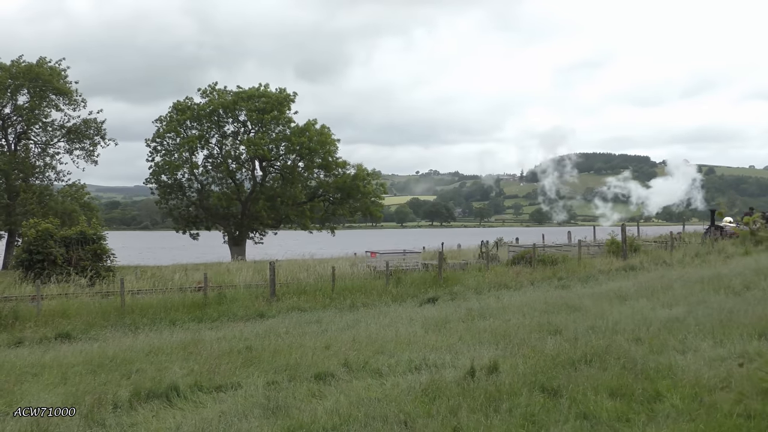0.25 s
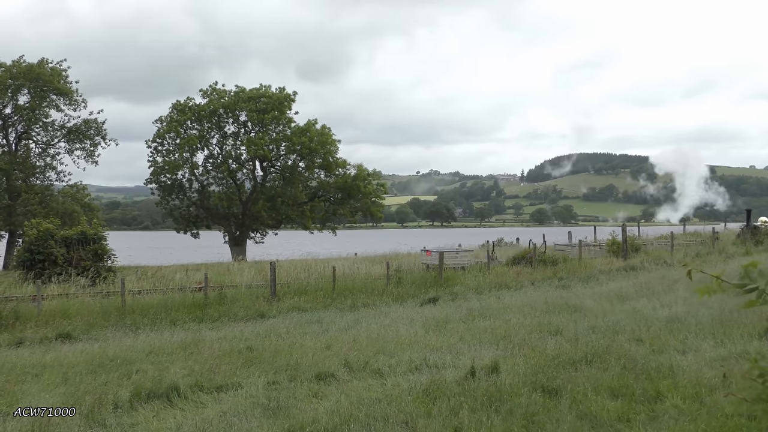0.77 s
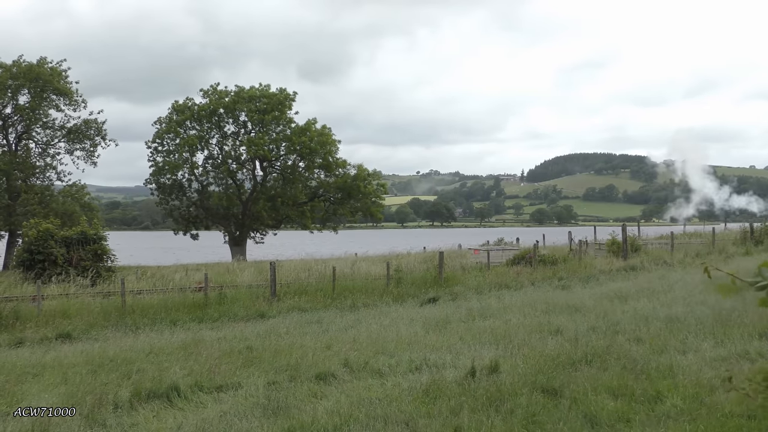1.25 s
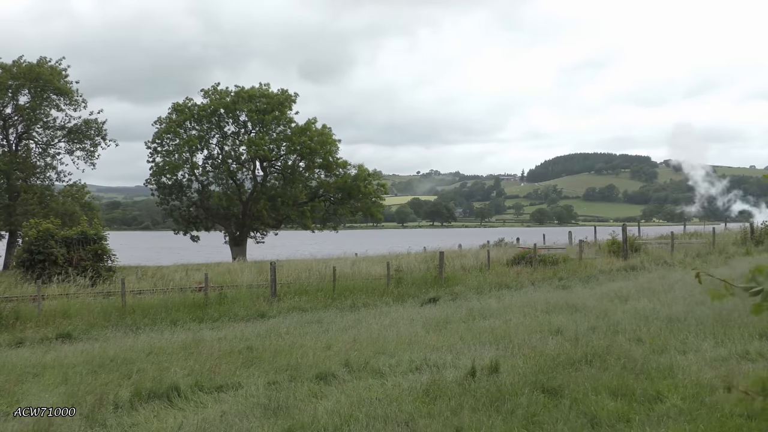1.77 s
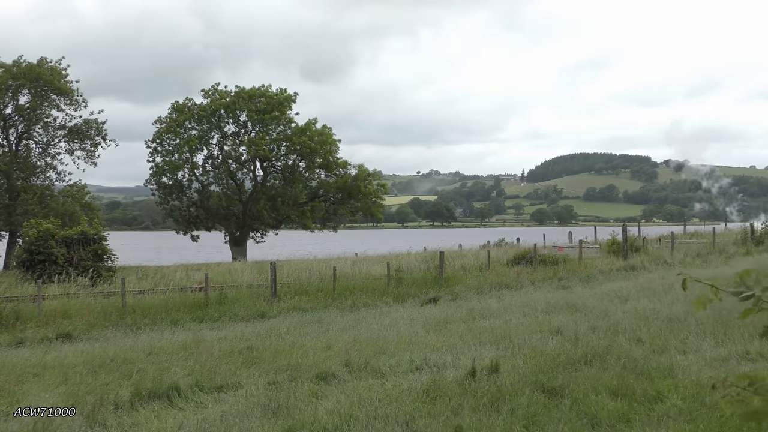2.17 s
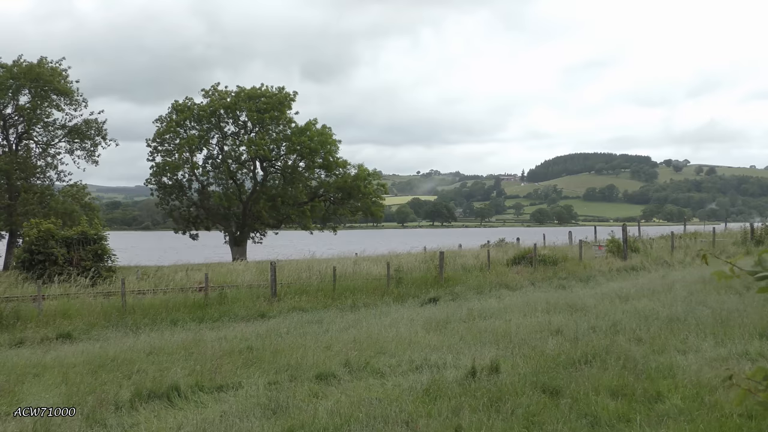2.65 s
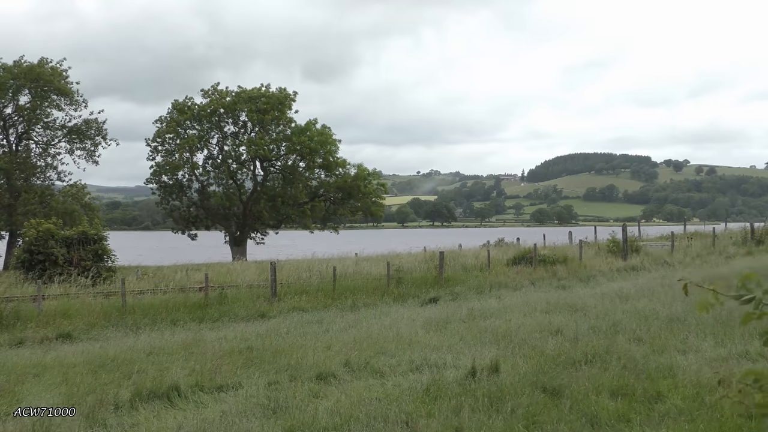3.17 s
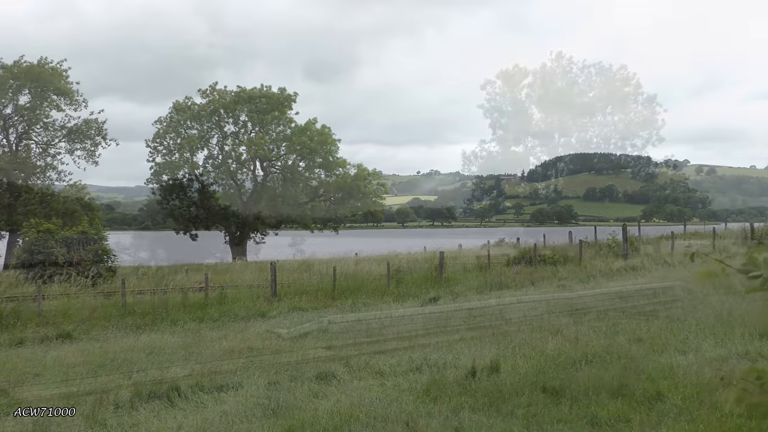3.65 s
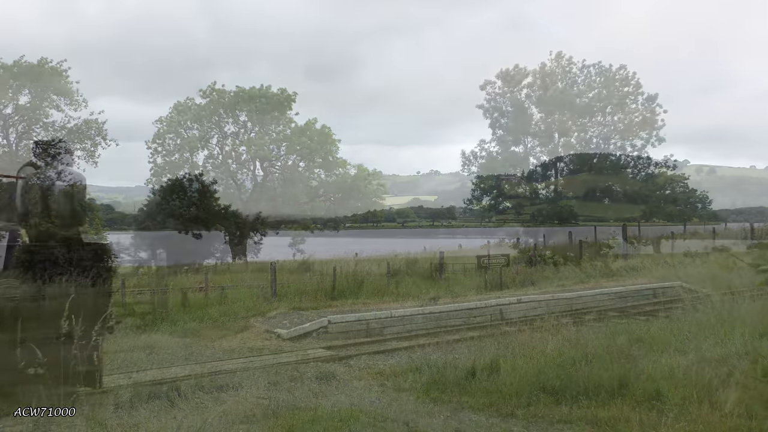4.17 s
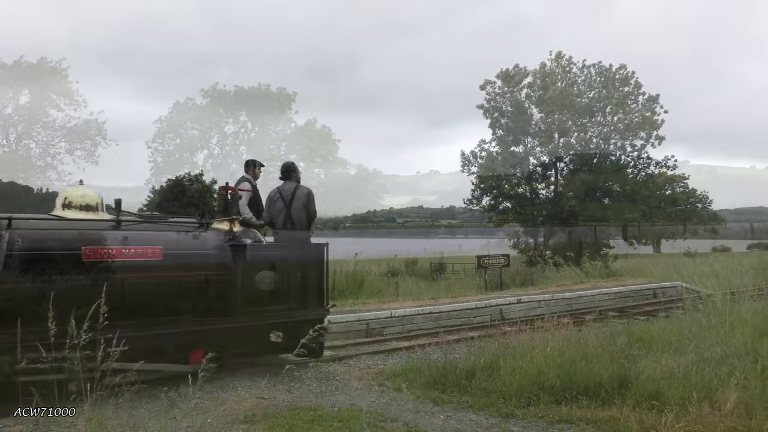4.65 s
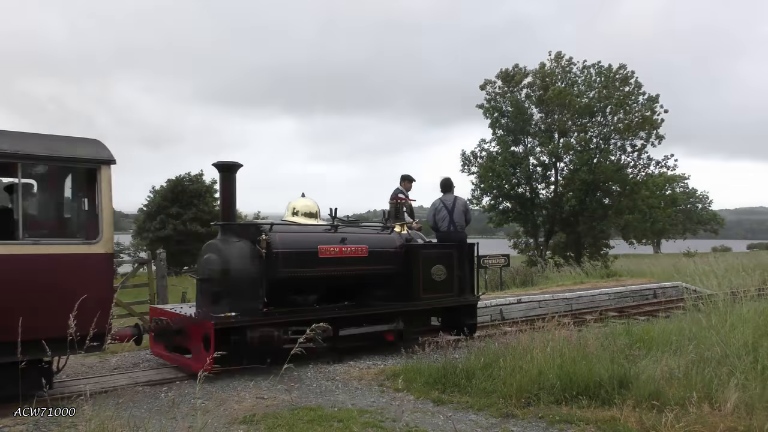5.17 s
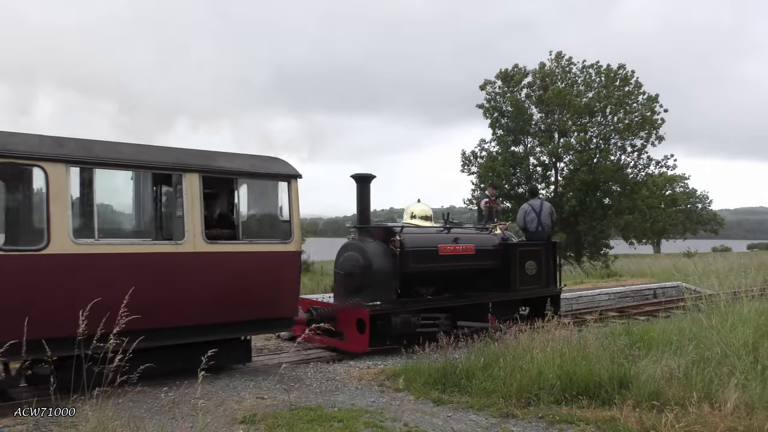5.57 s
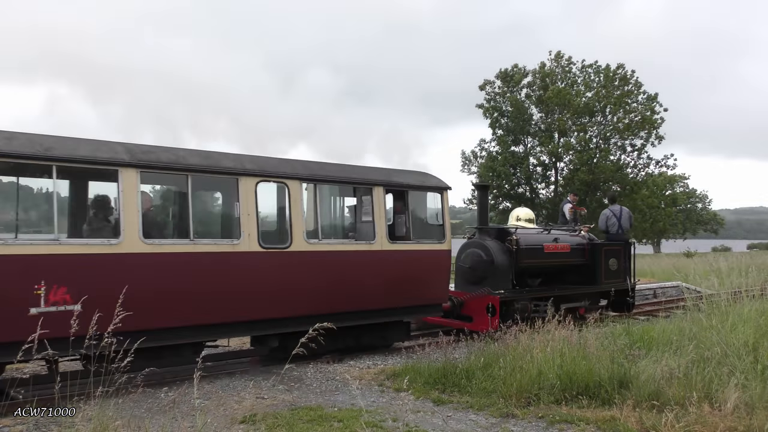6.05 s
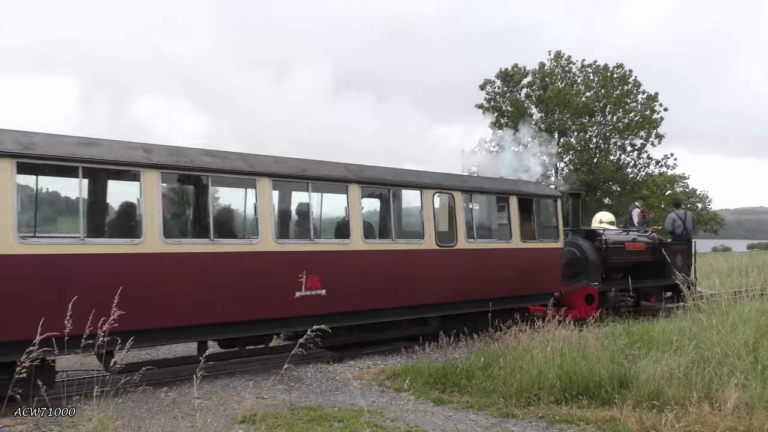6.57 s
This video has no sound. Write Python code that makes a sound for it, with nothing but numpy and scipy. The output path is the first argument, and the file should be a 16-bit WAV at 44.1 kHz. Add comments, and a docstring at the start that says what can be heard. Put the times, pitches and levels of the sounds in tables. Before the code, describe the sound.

First a quiet, distant perspective: the train's rushing noise and bright ticks dwindle in the left channel over faint meadow air, with thin falling chirps. Then a trackside microphone hears the engine and carriages pass close in the centre, much louder: irregular hard knocks, grinding wheels, loose iron clanking, a fuzzy low hum, short honks and a thin steam whistle under bright hiss.

```python
"""A small steam train by a lake, in two scenes joined by a cross-fade.
First it draws away, left channel only: noise bands for rumble, rush and rattle sink as distance grows, under
noise-burst coupling ticks, faint air and falling-sine bird chirps. Then it passes close and centred: noise bands
for roar, grind and leaking steam; bursts and decaying modes for wheels over rail joints; ringing sines for
clanks and clinks; noise-modulated sines for hum, whistle and short honks. A low sine drone runs through both."""
import sys
import numpy as np
from scipy import signal
from scipy.fft import rfft, irfft, next_fast_len
from scipy.io import wavfile
from scipy.ndimage import uniform_filter1d

SR = 44100
rng = np.random.default_rng(int(sys.argv[2]) if len(sys.argv) > 2 else 0)


def persist_wave(psi):
    """Save psi, clipped to +-1, as 16-bit WAV."""
    counts = np.round(np.clip(psi, -1, 1) * 32767).astype(np.int16)
    wavfile.write(sys.argv[1], SR, np.atleast_2d(counts).T)


N = 300762
T = np.arange(N) / SR  # s

# Distant levels are before FAR_GAIN and the fade; close levels are before the fade.
# Spectrum of the outdoor air. Each row: frequency in Hz, relative level in dB.
AIR_SPECTRUM = [(2060, -21), (3600, -3), (6730, -3.5), (8690, -12.5), (15500, -23)]
# Bird chirps. Each row: start in seconds, length in seconds, first pitch in Hz, level in dB.
CHIRPS = [(1.385, .057, 7500, -55), (1.527, .06, 7150, -53), (2.415, .06, 7000, -63),
          (2.79, .05, 6450, -66), (3.13, .03, 7300, -68)]
# Spectrum of the distant rumble. Each row: frequency in Hz, relative level in dB.
FAR_RUMBLE_SPECTRUM = [(35, -70), (60, -58), (95, -11), (172, 2.5), (268, 0), (330, -11.5), (430, -13),
                       (730, -120)]
# Spectrum of the distant rolling rush. Each row: frequency in Hz, relative level in dB.
FAR_RUSH_SPECTRUM = [(200, -51), (340, -7.5), (454, -1), (896, -0.5), (1300, -2.5), (1500, -7), (2200, -8),
                     (2450, -14.5), (4000, -25), (6000, -63)]
# Spectrum of the distant rattle. Each row: frequency in Hz, relative level in dB.
FAR_RATTLE_SPECTRUM = [(1530, -8.5), (2600, 2.5), (4420, -3), (6920, -13), (11800, -28), (15500, -64)]
# Spectrum of the coupling ticks. Each row: frequency in Hz, relative level in dB.
TICK_SPECTRUM = [(2800, -3.5), (4000, 1.5), (7500, -8.5), (12000, -27), (15500, -52)]
# Distant coupling ticks. Each row: start in seconds, nominal peak in dB.
FAR_TICKS = [(0.048, -31), (0.1925, -35), (0.2044, -30), (0.2774, -33), (0.304, -35), (0.3287, -33),
             (0.3504, -31), (0.443, -39), (0.465, -36), (0.491, -29), (0.516, -29), (0.565, -31.5),
             (0.611, -33), (0.7037, -37), (0.7297, -39), (0.7564, -35), (0.781, -31.5), (0.8325, -33.5),
             (0.9193, -37.5), (0.944, -36), (0.994, -32.5), (1.021, -38), (1.04, -35), (1.1174, -38),
             (1.2546, -35), (1.3154, -37.5), (1.4551, -39), (1.496, -39), (1.5196, -36.5), (1.5868, -41),
             (1.6472, -40), (1.9005, -43), (2.323, -42), (2.878, -48)]
# Spectrum of the leaking steam. Each row: frequency in Hz, relative level in dB.
STEAM_SPECTRUM = [(2350, -6.5), (4300, -9.5), (8600, -7), (11300, -8.5), (15700, -20.5)]
# Steam loudness. Each row: time in seconds, level in dB.
STEAM_LEVEL = [(3.4, -45), (3.6, -50), (3.95, -46.5), (4.2, -51), (5.0, -43), (5.8, -38.5), (6.45, -42.5),
               (6.82, -40)]
# Whistling steam leak. Each row: time in seconds, pitch in Hz, level in dB.
WHISTLE = [(5.35, 8350, -75), (5.6, 8550, -53), (5.95, 8600, -60)]
# Envelope of the low hum. One row: peak in seconds, rise in dB/s, fall in dB/s, peak level in dB.
HUM_ENVELOPE = (4, 200, 16.5, -26.5)
# Envelope of the high, rough tone. One row: peak in seconds, rise in dB/s, fall in dB/s, peak level in dB.
SING_ENVELOPE = (3.95, 25, 50, -33)
# Short honks. Each row: start in seconds, low tone level in dB, high tone level in dB.
HONKS = [(5.027, -14.5, -31), (5.193, -35, -29.5), (5.341, -12.5, -27.5)]
# The two honk tones. Each row: pitch in Hz, roughness as a fraction of the amplitude.
HONK_TONES = [(560, 0.12), (2040, 1)]
# Modes of the loose ironwork. Each row: pitch in Hz, relative level in dB, 60 dB decay time in seconds.
IRON_MODES = [(3570, 3, .05), (4220, 2, .08), (5700, -4, .22), (6470, -5, .16)]
# Ironwork clinks. Each row: start in seconds, nominal peak in dB.
CLINKS = [(6.1295, -32), (6.3729, -40)]
# Spectrum of the joint crack. Each row: frequency in Hz, relative level in dB.
CRACK_SPECTRUM = [(290, -47), (500, -2), (1410, 0.5), (2290, -9.5), (3180, -18.5), (6000, -41)]
# Spectrum of the bright joint snap. Each row: frequency in Hz, relative level in dB.
SNAP_SPECTRUM = [(2000, -9), (3200, 2.5), (5000, -4.5), (9650, -18.5), (15000, -35)]
# Wheels over joints. Each row: start in seconds, nominal crack, snap and thud peaks in dB, thud pitch in Hz.
JOINTS = [(3.615, -37, -48, -18, 385), (3.686, -3, -18, -13.5, 447), (3.7848, -8, -26, -11, 835),
          (4.0268, -12.5, -23, -18, 423), (4.0896, -12, -25, -21, 1137), (4.213, -15, -29, -18, 325),
          (4.276, -19, -37, -11.5, 553), (4.283, -13, -39, -25, 1450), (4.4, -11.5, -31, -21, 303),
          (4.482, -13, -23.5, -13.5, 500), (4.502, -24, -38, -24, 500), (4.5485, -7.5, -17.5, -11, 741),
          (4.6424, -17.5, -23, -17, 236), (4.744, -10.5, -26, -8.5, 580), (5.0225, -11, -27, -14, 547),
          (5.1499, -10.5, -18, -11, 697), (5.24, -14.5, -25, -17, 810), (5.2703, -18, -28, -9, 406),
          (5.3405, -16, -28, -23, 550), (5.3901, -8.5, -20, -9, 620), (5.482, -11, -25, -18, 464),
          (5.6513, -10.5, -30, -18, 1175), (5.806, -20, -32, -11.5, 696), (5.85, -15.5, -22, -31, 1210),
          (5.9437, -2, -15.5, -23, 785), (6.0119, -9.5, -16.5, -13, 410), (6.037, -8, -15.5, -20, 550),
          (6.0735, -17, -32, -6.5, 648), (6.1078, -16, -21, -35, 840), (6.1655, -4, -19.5, -28, 1303),
          (6.2337, -11, -21.5, -7.5, 808), (6.323, -8, -20, -11, 770), (6.614, -24, -40, -13.5, 296),
          (6.6297, -7, -19, -11, 398), (6.7231, -11, -21.5, -15, 752)]
# Spectrum of the close roar. Each row: frequency in Hz, relative level in dB.
ROAR_SPECTRUM = [(24, -64), (40, -64), (92, -23.5), (160, -8), (288, 1.5), (648, -2.5), (826, -2),
                 (916, -7), (1320, -9.5), (2500, -26), (3250, -64)]
# Spectrum of the close grind. Each row: frequency in Hz, relative level in dB.
GRIND_SPECTRUM = [(530, -20), (900, 3.5), (1330, 1), (1720, -1.5), (1900, -3.5), (3080, -11.5), (4370, -15),
                  (6000, -25.5), (7800, -29), (13200, -120)]
# Close rolling; it steps up as wheels reach a nearer rail. Each row: time in seconds, level in dB.
ROLLING_LEVEL = [(3.6, -33), (3.63, -26.5), (3.92, -27), (3.94, -15.5), (4.02, -24), (4.24, -23),
                 (4.28, -19), (4.46, -24.5), (4.72, -18.5), (4.79, -18), (5.03, -18), (5.3, -21.5),
                 (5.44, -21.5), (5.8, -19), (6.1, -20), (6.45, -21), (6.82, -19)]
# Cross-fade. One row: start in seconds, end in seconds.
FADE_S = (3.25, 5.25)
# Recorder hiss and rumble, each channel. Each row: frequency in Hz, density in dB per Hz.
HISS_DENSITY = [(20, -89), (60, -104), (15000, -119)]

FAR_GAIN = 2
AIR_DB = -64
DRONE_HZ, FAR_DRONE_DB, NEAR_DRONE_DB = 25.6, -67, -69
CHIRP_FALL_HZ_PER_S = 11500
DOUBLING_S = 1.68  # the receding train has doubled its distance after this time
# Starting levels, and the multiple of the distance loss that each band takes.
RUMBLE_DB, RUSH_DB, RATTLE_DB = -42.5, -33, -39
RUMBLE_LOSS, RUSH_LOSS, RATTLE_LOSS = 0.26, 0.23, 2.37
RUSH_SINK_DB_PER_S = 2.27  # the bank hides the wheels more and more
DROP_START_S, DROP_LENGTH_S, DROP_DB = 3.13, 0.063, -2
TICK_T60_S, CRACK_T60_S, SNAP_T60_S, THUD_T60_S, CLANK_T60_S = 0.1, 0.077, 0.073, 0.073, 0.096
HUM_HZ, SING_HZ = 206.5, 1600
HONK_LENGTH_S = 0.0296
CLANK_LOW_HZ, CLANK_HIGH_HZ = 346.6, 1740
CLANKS_PER_S_PER_PITCH, CLANK_OVER_ROLLING_DB = 1.9, -10
GRIND_DB, GRIND_FOLLOW, GRIND_PIVOT_DB = -28.5, 0.7, -20.5  # grind follows a share of the rolling's swings
SIDE_HZ, SIDE_WIDTH_HZ, SIDE_DB = 2400, 1230, -21.5  # band where the two channels differ a little
BAND_LIMIT_HZ = 15850


def amp(db):
    """Amplitude ratio of a level in dB."""
    return 10 ** (np.asarray(db) / 20)


def evened(x):
    """Scales x to rms 1."""
    return x / np.sqrt(np.mean(x ** 2) + 1e-20)


def smooth_noise(length, size):
    """Noise slowed by a moving average of `size` samples; rms 1."""
    return evened(uniform_filter1d(rng.standard_normal(length), size=size))


def curve(rows):
    """Time-value table at sample rate."""
    return np.interp(T, *np.transpose(rows))


def held(peak_s, rise_db_per_s, fall_db_per_s, db):
    """Gain that climbs to a peak, then falls."""
    rise_db = np.minimum(rise_db_per_s * (T - peak_s), 0)
    fall_db = np.maximum(fall_db_per_s * (T - peak_s), 0)
    return amp(db + rise_db - fall_db)


def colour(x, points):
    """Filters x by a spectrum drawn on a log-frequency axis."""
    hz, db = np.transpose(points)
    n = next_fast_len(len(x))
    bin_hz = np.fft.rfftfreq(n, 1 / SR)
    gain = amp(np.interp(np.log(bin_hz + 1), np.log(hz + 1), db))
    return irfft(rfft(x, n) * gain, n)[:len(x)]


def add(mix, start_s, sound):
    """Adds a sound into the mix in place, cut at the end."""
    part = mix[round(start_s * SR):][:len(sound)]
    part += sound[:len(part)]


def random_blows(spread_db, per_s):
    """Sparse impulses at random times with exponentially spread levels in dB."""
    strengths = amp(spread_db * np.minimum(rng.exponential(1, N), 3))
    return strengths * (rng.random(N) < per_s / SR)


def rush(points, patchy_db, flicker_db, grit_db, grit_per_s):
    """Noise with drifting patches and shared flicker, plus random small knocks of the same colour; rms 1."""
    frames = N // 128 + 5
    real, imag, patches = rng.standard_normal((frames, 257, 3)).T
    patches = uniform_filter1d(patches, size=8, axis=0)  # across frequency
    patches = evened(uniform_filter1d(patches, size=20, axis=1))  # across time
    gain = amp(patchy_db * patches + flicker_db * smooth_noise(frames, 8))
    bed = signal.istft((real + 1j * imag) * gain, nperseg=512, noverlap=384)[1][:N]
    knock_power = uniform_filter1d(random_blows(4.7, grit_per_s) ** 2, size=130)
    decay = np.exp(-1 / (0.0018 * SR))
    knock_power = signal.lfilter([1], [1, -decay], knock_power)
    grit = np.sqrt(abs(knock_power)) * rng.standard_normal(N)
    return evened(colour(evened(bed) + amp(grit_db) * evened(grit), points))


def bursts(rows, points, rise_s, hold_s):
    """Noise bursts that snap in, hold while parts chatter, then die; rows of start s, dB, t60 s."""
    t = np.arange(6000) / SR
    power = np.zeros(N)
    attack = np.minimum(t / rise_s, 1) ** 2
    accent = 1 + 1.13 * np.exp(-(t / 0.0011) ** 2)
    for start_s, db, t60_s in rows:
        level_db = db - 60 * np.maximum(t - hold_s, 0) / t60_s
        add(power, start_s, amp(2 * level_db) * attack * accent)
    return 0.39 * np.sqrt(power) * evened(colour(rng.standard_normal(N), points))


def meadow():
    """Smooth outdoor air: steady coloured noise that does not recede with the train."""
    return amp(AIR_DB) * evened(colour(rng.standard_normal(N), AIR_SPECTRUM))


def drone():
    """Steady low sine."""
    return np.sin(2 * np.pi * DRONE_HZ * T)


def birds():
    """Chirps: sines falling in pitch under a rounded envelope."""
    out = np.zeros(N)
    for start_s, length_s, from_hz, db in CHIRPS:
        hz = from_hz - CHIRP_FALL_HZ_PER_S * np.arange(0, length_s, 1 / SR)
        tone = np.sin(2 * np.pi * np.cumsum(hz) / SR)
        add(out, start_s, np.sqrt(2) * amp(db) * tone * signal.windows.tukey(len(hz), .6))
    return out


def far_ticks():
    """Distant couplings tick: short bright noise bursts."""
    rows = [(start_s, db, TICK_T60_S) for start_s, db in FAR_TICKS]
    return bursts(rows, TICK_SPECTRUM, rise_s=0.0011, hold_s=0.0036)


def far_train():
    """Rumble, rush and rattle; distance takes the treble rattle fastest."""
    loss_db = -20 * np.log10(1 + T / DOUBLING_S)
    rumble = rush(FAR_RUMBLE_SPECTRUM, patchy_db=1.0, flicker_db=1.1, grit_db=-8.0, grit_per_s=27)
    rolling_rush = rush(FAR_RUSH_SPECTRUM, patchy_db=1.06, flicker_db=1.05, grit_db=-8.5, grit_per_s=80)
    rattle = rush(FAR_RATTLE_SPECTRUM, patchy_db=1.5, flicker_db=3.5, grit_db=-7.5, grit_per_s=170)
    out = amp(RUMBLE_DB + RUMBLE_LOSS * loss_db) * rumble
    out += amp(RUSH_DB + RUSH_LOSS * loss_db - RUSH_SINK_DB_PER_S * T) * rolling_rush
    out += amp(RATTLE_DB + RATTLE_LOSS * loss_db) * rattle
    # the bands sink a step together
    out *= amp(DROP_DB * np.clip((T - DROP_START_S) / DROP_LENGTH_S, 0, 1))
    return out + far_ticks()


def steam():
    """Steam leaking from the engine: bright, patchy noise."""
    hiss = rush(STEAM_SPECTRUM, patchy_db=1.5, flicker_db=1.6, grit_db=-14, grit_per_s=50)
    return amp(curve(STEAM_LEVEL)) * hiss


def whistle():
    """A steam leak whistles: a thin, noise-modulated sine climbing slowly."""
    time_s, hz, db = np.transpose(WHISTLE)
    tone = np.sin(2 * np.pi * np.cumsum(np.interp(T, time_s, hz)) / SR)
    return amp(np.interp(T, time_s, db, right=-120)) * smooth_noise(N, 500) * tone


def hum():
    """A fuzzy low tone and a rougher high one: noise riding on sines."""
    waver = 1 + .5 * smooth_noise(N, 1200)
    low = held(*HUM_ENVELOPE) * waver * np.sin(2 * np.pi * HUM_HZ * T)
    high = held(*SING_ENVELOPE) * smooth_noise(N, 220) * np.sin(2 * np.pi * SING_HZ * T)
    return low + high


def honk():
    """A part sticks and sings two uneven tones for a moment."""
    out = np.zeros(N)
    t = np.arange(round(HONK_LENGTH_S * SR)) / SR
    envelope = signal.windows.tukey(len(t), .3)
    for start_s, *levels_db in HONKS:
        for db, (hz, roughness) in zip(levels_db, HONK_TONES):
            shake = 1 + roughness * smooth_noise(len(t), 150)
            add(out, start_s, amp(db) * shake * np.sin(2 * np.pi * hz * t) * envelope)
    return out


def clanks():
    """Frames and rods knock at random, each pitch with its own blows; high ones are fainter."""
    out = np.zeros(N)
    t = np.arange(4000) / SR
    attack = np.minimum(t / 0.0032, 1)
    for hz in np.geomspace(CLANK_LOW_HZ, CLANK_HIGH_HZ, num=24):
        blows = random_blows(5.2, CLANKS_PER_S_PER_PITCH)
        decay = amp(-5 * np.log2(hz) - 60 * t / CLANK_T60_S)  # 5 dB less per octave
        ring = decay * attack * np.sin(2 * np.pi * hz * t)
        out += signal.oaconvolve(blows, ring)[:N]
    return amp(curve(ROLLING_LEVEL) + CLANK_OVER_ROLLING_DB) * evened(out)


def clinks():
    """Loose iron parts touch and ring briefly in decaying modes, chattering."""
    out = np.zeros(N)
    t = np.arange(8000) / SR
    for start_s, db in CLINKS:
        for hz, mode_db, t60_s in IRON_MODES:
            add(out, start_s, amp(db + mode_db - 60 * t / t60_s) * np.sin(2 * np.pi * hz * t))
    return out * (1 + .5 * smooth_noise(N, 200))


def thuds():
    """Wheel and rail thud: seven modes around a pitch, in step early on, then drifting apart."""
    out = np.zeros(N)
    t = np.arange(6000) / SR
    attack = np.minimum(t / 0.0038, 1)
    scatter = rng.uniform(-0.11, 0.15, (len(JOINTS), 7, 1))
    detunes = np.linspace(-.8, .8, num=7)[:, None] + scatter
    for (start_s, _, _, db, hz), detune in zip(JOINTS, detunes):
        mode_hz = hz * np.exp(0.549 * detune)
        ring = np.sin(2 * np.pi * mode_hz * (t - .0028)).sum(0)  # phases meet at 2.8 ms
        add(out, start_s, amp(db - 60 * t / THUD_T60_S) * attack * .5 * ring)
    return out


def joints():
    """Each wheel over a joint gives a crack, a bright snap and a short rough thud."""
    crack_rows = [(start_s, db, CRACK_T60_S) for start_s, db, *_ in JOINTS]
    snap_rows = [(start_s, db, SNAP_T60_S) for start_s, _, db, *_ in JOINTS]
    blows = thuds()
    blows += bursts(crack_rows, CRACK_SPECTRUM, rise_s=0.00043, hold_s=0.0038)
    blows += bursts(snap_rows, SNAP_SPECTRUM, rise_s=0.00088, hold_s=0.0017)
    # small wheels give little bass
    return signal.sosfilt(signal.butter(3, 170, "highpass", fs=SR, output="sos"), blows)


def rolling():
    """Rough wheels on rail shake the frames: a low roar and a higher grind."""
    roar_db = curve(ROLLING_LEVEL)
    grind_db = GRIND_DB + GRIND_FOLLOW * (roar_db - GRIND_PIVOT_DB)
    roar = rush(ROAR_SPECTRUM, patchy_db=1.45, flicker_db=0.7, grit_db=-11.5, grit_per_s=41)
    grind = rush(GRIND_SPECTRUM, patchy_db=1.7, flicker_db=1.5, grit_db=-8.0, grit_per_s=54)
    return amp(roar_db) * roar + amp(grind_db) * grind


def flickering_side(near):
    """Channel difference: one band of the close sound, flickering in level."""
    edges_hz = [SIDE_HZ - SIDE_WIDTH_HZ / 2, SIDE_HZ + SIDE_WIDTH_HZ / 2]
    band = signal.butter(2, edges_hz, "bandpass", fs=SR, output="sos")
    flickering = signal.sosfilt(band, near) * smooth_noise(N, 60)
    return amp(SIDE_DB) * signal.sosfilt(band, flickering)


def scene():
    """The distant train, left only, fades out as the centred close train fades in."""
    fade = np.interp(T, FADE_S, [1, 0])
    far = meadow() + amp(FAR_DRONE_DB) * drone() + birds() + far_train()
    far = FAR_GAIN * far * fade
    near = amp(NEAR_DRONE_DB) * drone() + steam() + whistle() + hum() + honk()
    near += clanks() + clinks() + joints() + rolling()
    near *= 1 - fade
    side = flickering_side(near)
    return np.array([far + near + side, near - side])


def record(dry):
    """Faint recorder hiss and rumble, a soft overload on the hardest knocks, then the band limit."""
    # sqrt(SR / 2) turns density per Hz into sample amplitude
    hiss = np.array([colour(rng.standard_normal(N), HISS_DENSITY) for _ in dry]) * np.sqrt(SR / 2)
    x = dry + hiss
    x = x / (1 + x ** 10) ** .1
    lowpass = signal.firwin(511, BAND_LIMIT_HZ, window=("kaiser", 9), fs=SR)
    return signal.oaconvolve(x, lowpass[None], "same")


dry = scene()
out = record(dry)
persist_wave(out)
```